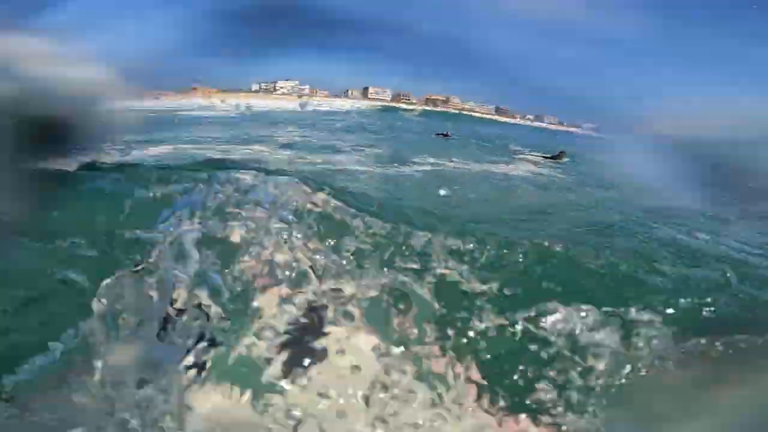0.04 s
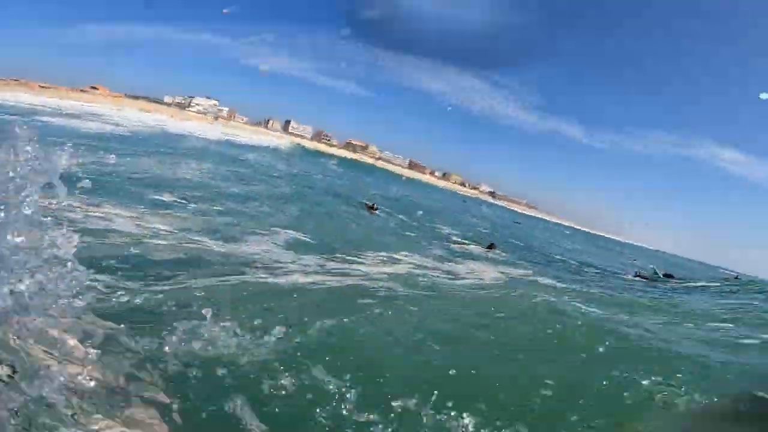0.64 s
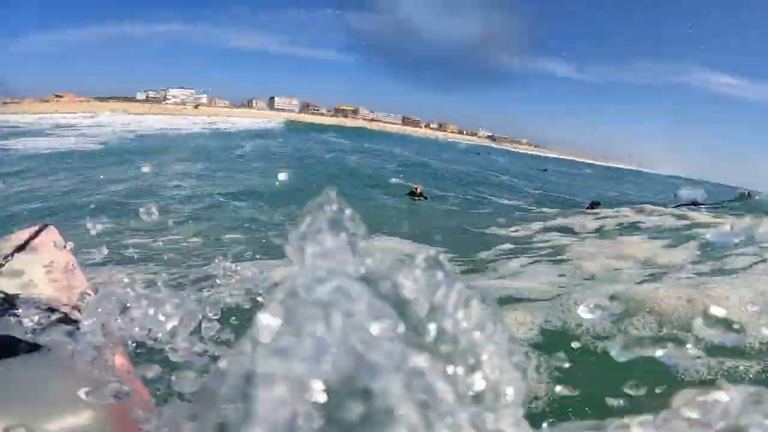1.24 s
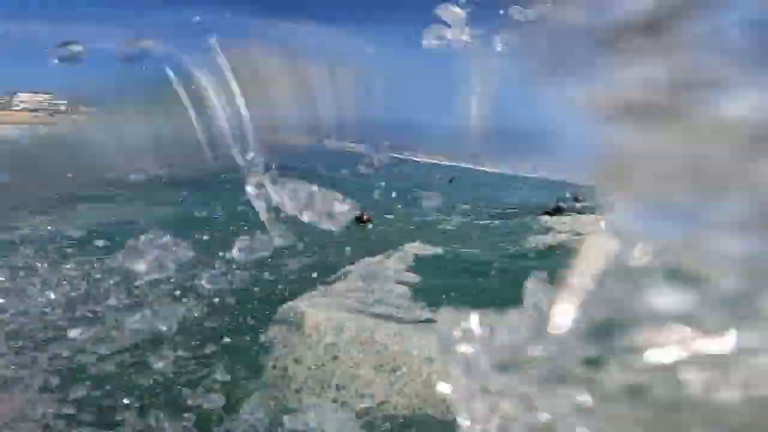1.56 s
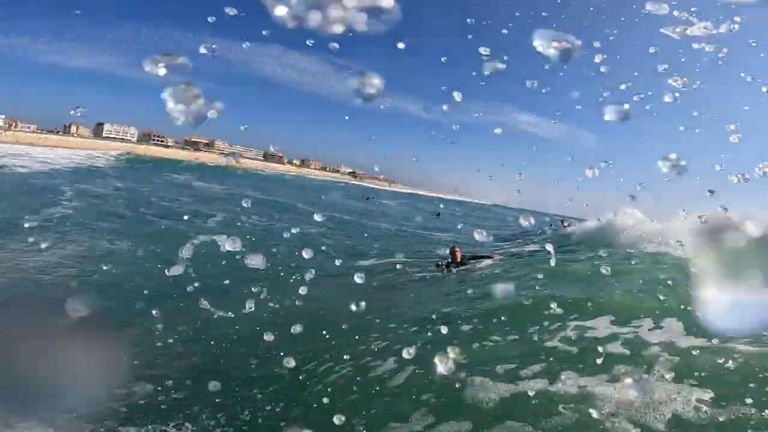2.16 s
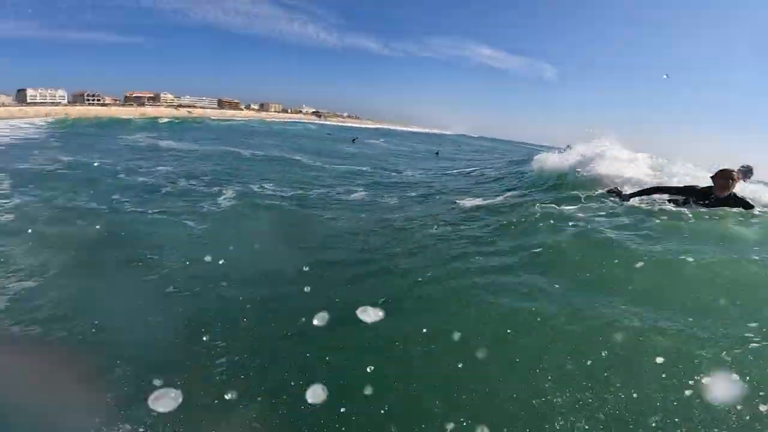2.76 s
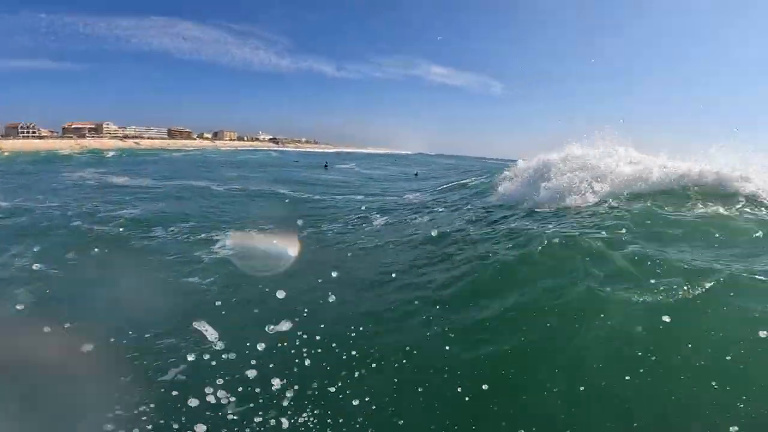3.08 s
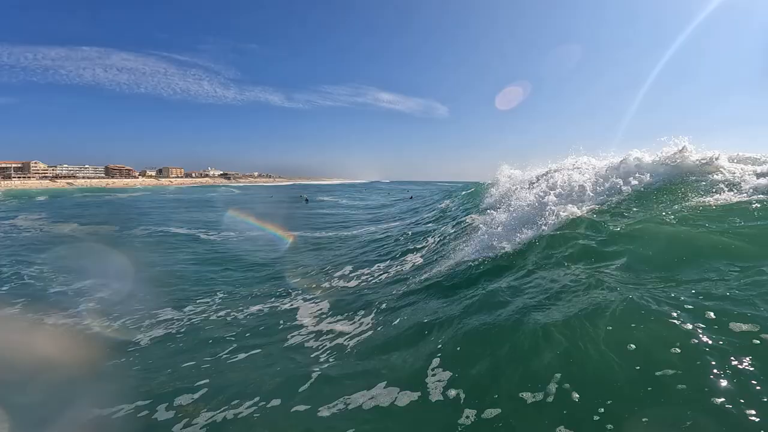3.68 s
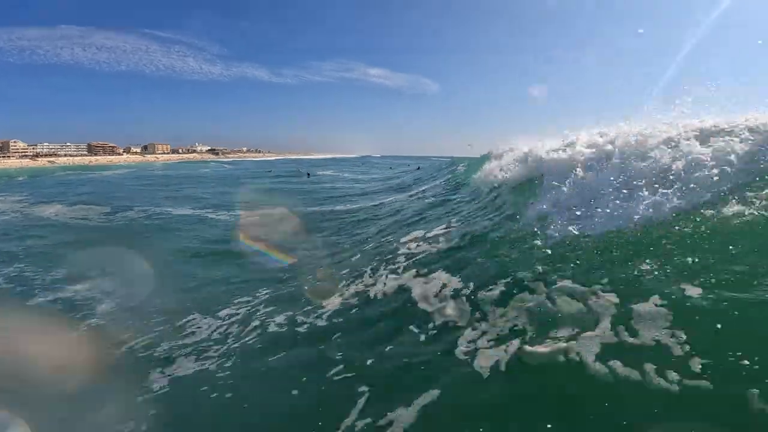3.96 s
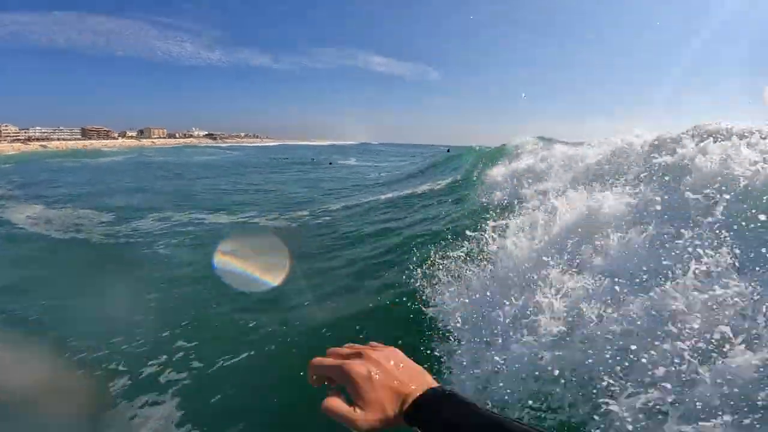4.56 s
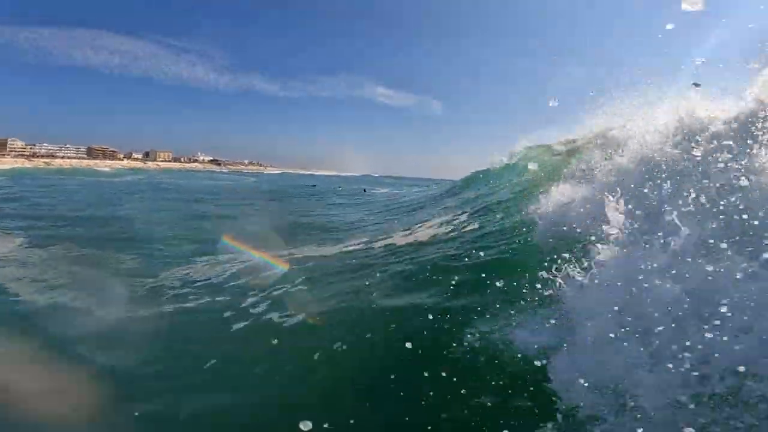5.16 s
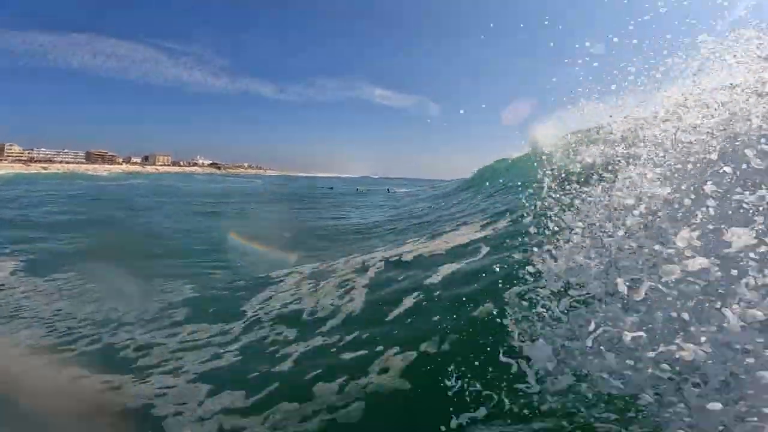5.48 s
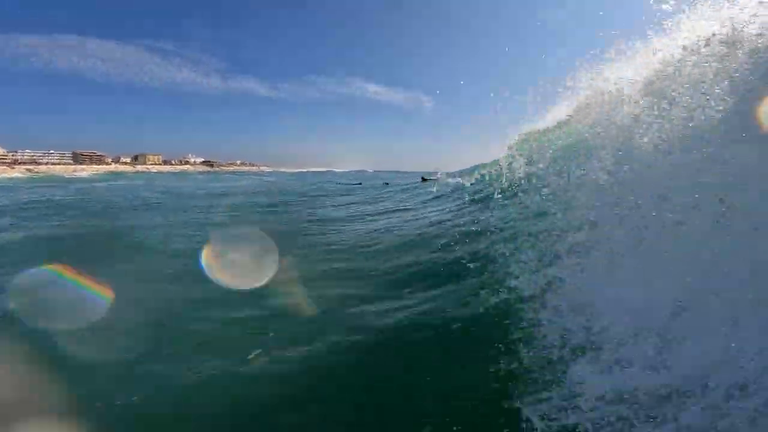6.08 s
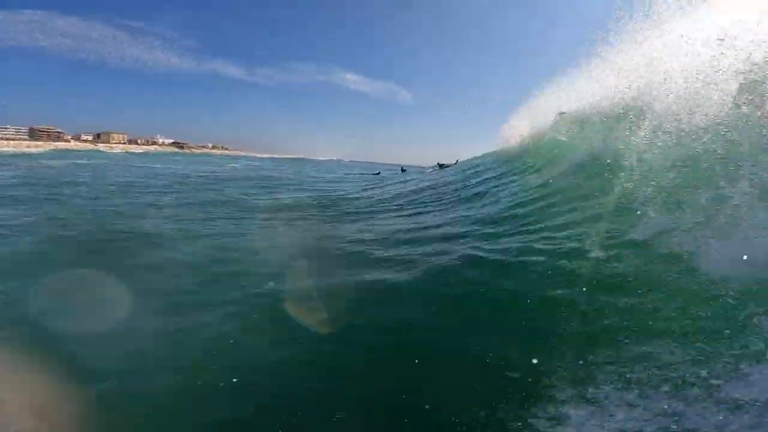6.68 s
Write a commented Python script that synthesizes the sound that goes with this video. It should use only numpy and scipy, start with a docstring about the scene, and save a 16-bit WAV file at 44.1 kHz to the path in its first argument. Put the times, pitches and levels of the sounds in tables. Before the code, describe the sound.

A surfer paddles through the sea, heard on a small waterproof camera at the waterline. Splashes slap the housing, drops tick and water gurgles around the board, the bigger splashes briefly muffling everything. The sound then settles into a steady, hollow rush of white water with gusty wind rumble as the wave is ridden. Near the end come one hard slap and a few smaller splashes and drips.

```python
"""Surfing, heard at the waterline

A surfer paddles into a wave and rides it, a small waterproof camera close to the water. Wind and spray
rush over its wet microphone ports, which ring hollowly; water churns and gurgles round the board.
Splashes slap the housing and drops tick on it; splashes and a few drops leave a film that muffles
the ports until it drains."""
import sys
import numpy as np
from scipy import signal
from scipy.fft import rfft, irfft, next_fast_len
from scipy.io import wavfile
from scipy.ndimage import uniform_filter1d, map_coordinates

SR = 44100
rng = np.random.default_rng(int(sys.argv[2]) if len(sys.argv) > 2 else 0)


def dump(signal):
    """Clip the signal to [-1, 1] and save it as 16-bit WAV at the path in sys.argv[1]."""
    limited = np.clip(np.atleast_2d(signal).T, -1, 1)
    pcm = np.round(limited * 32767).astype(np.int16)
    wavfile.write(sys.argv[1], SR, pcm)


N = 305613
TIME = np.arange(N) / SR
PADDLE_END_S = 1.45

# water slapping board and housing: (time [s], relative level [dB], crest pitch [Hz], film loss [dB])
SLAPS = [(0.158, -4.5, 775, 18), (0.878, -1.5, 824, 17.5), (0.9224, -5, 622, 19), (0.969, -11, 283.4, 7),
         (1.1082, -7, 463, 3.5), (1.274, -7, 926, 11), (1.4102, 0.5, 565, 12), (1.428, -14.5, 560, 8),
         (1.4532, -2.5, 660, 19), (1.492, -6.5, 625, 8), (1.505, -6, 684, 10.5), (1.5216, -11, 751, 4),
         (1.5262, -2.5, 296.5, 2), (1.641, -8, 323, 6), (1.655, -13, 521, 10), (1.677, -5.5, 351, 4.5),
         (1.767, -6, 323, -9), (1.781, -5, 690, 5.5), (1.7909, -7, 664, 8.5), (1.885, -10, 627, 1),
         (2.196, -13.5, 379, 1.5), (2.243, -9, 321, 4), (2.289, -8, 436, 6.5), (2.342, -5.5, 297, 2.5),
         (2.396, -8, 322, 6.5), (2.4244, -6, 517, 11.5), (5.574, 0.5, 737, 24), (6.032, -8.5, 405, -1.5),
         (6.1129, -9.5, 548, 3.5), (6.16, -10, 890, 4), (6.21, -5.5, 170, 1)]
# port roll-off above the upper mode: (frequency [Hz], gain [dB])
MEMBRANE = [(3800, -1.5), (4700, -15), (7000, -23.5), (12000, -23)]


def amp(db):
    """Decibels to gain."""
    return 10 ** (np.asarray(db) / 20)


def unit(x):
    """Scale to rms 1."""
    return x / np.sqrt(np.mean(x ** 2) + 1e-20)


def along(points, hz):
    """(Hz, value) points read on a log axis."""
    f, v = np.transpose(points)
    return np.interp(np.log(hz + 1), np.log(f + 1), v)


def curves(rows):
    """Per-sample curve for each column after the time."""
    s, *columns = np.transpose(rows)
    return [np.interp(TIME, s, c) for c in columns]


def wobble(rate_hz):
    """Smooth random curve, rate_hz knots a second."""
    return map_coordinates(rng.standard_normal(int(N * rate_hz / SR) + 4), [TIME * rate_hz])


def swell(s, length_s):
    """Rounded rise and fall, peak 1."""
    return np.sqrt(abs(np.sin(np.pi * np.clip((TIME - s) / length_s, 0, 1))))


def add(track, s, sound):
    """Mix a sound into a track at time s."""
    start = max(round(s * SR), 0)
    track[start:start + len(sound)] += sound[:N - start]


def panned(x, left_db):
    """Stereo with left minus right = left_db."""
    return x * amp([[left_db / 2], [-left_db / 2]])


def filtered(x, response):
    """Apply a complex frequency response."""
    size = next_fast_len(N + SR // 4)
    return irfft(rfft(x, size) * response(np.fft.rfftfreq(size, 1 / SR)), size)[..., :N]


def coloured(x, points):
    """Apply a (Hz, dB) spectrum."""
    return filtered(x, lambda hz: amp(along(points, hz)))


def noise(spectrum, patchy_db, channels=1):
    """Coloured noise with drifting patches of random gain, rms 1."""
    bins = signal.stft(rng.standard_normal((channels, N)), nperseg=512)[2]
    patches = uniform_filter1d(rng.standard_normal(bins.shape[1:]), size=4, axis=0)
    patches = uniform_filter1d(patches, size=8, axis=1)
    white = signal.istft(bins * amp(patchy_db * unit(patches)), nperseg=512)[1][:, :N]
    return unit(coloured(white, spectrum))


def ringing(pitch_hz, width_hz, channels=1):
    """Noise-driven resonance of moving pitch, rms 1."""
    white = rng.standard_normal((2, channels, N))
    drive = filtered(white, lambda hz: 1 / (1 + (hz / width_hz) ** 2) * (hz < 500))
    phase = 2 * np.pi * np.cumsum(pitch_hz) / SR
    return unit(drive[0] * np.sin(phase) + drive[1] * np.cos(phase))


def grains(count, span_s, hz, spread, cycles, glide, size_db):
    """Ringing grains scattered over a span, rms 1 there; glide bends each one's pitch."""
    onset_s = rng.uniform(*span_s, (count, 1))
    pitch_hz = hz * np.exp(spread * rng.standard_normal((count, 1)))
    size = amp(size_db * np.minimum(rng.exponential(1, (count, 1)), 3)) * rng.choice([-1, 1], (count, 1))
    k = np.arange(SR // 40)
    age = k / SR * pitch_hz / cycles
    envelope = size * np.exp(-age) * (1 - np.exp(-4 * age)) ** 2
    waves = envelope * np.sin(2 * np.pi * cycles * age * (1 + glide * age))
    track = np.bincount(((onset_s * SR).astype(int) + k).ravel(), waves.ravel(), N)[:N]
    return track / np.sqrt(np.sum(track ** 2) / (SR * (span_s[1] - span_s[0])))


def ports(x):
    """Wet ports: left favours low mids, right the highs; left leads by about 1/4 cycle above the bass."""
    # port balance: (frequency [Hz], left minus right [dB])
    balance = [(40, -8), (120, 4.5), (200, 7), (400, 5.5), (800, 5), (1100, 3.5), (1450, -1), (2200, -4),
               (3300, -6), (5000, -12)]

    def response(hz):
        lead_rad = along([(60, 0.089), (250, 0.95), (1200, 1.73), (4000, 1.41)], hz)
        left = amp(along(balance, hz) / 2) * np.exp(.5j * lead_rad)
        pair = np.array([left, 1 / left])
        return pair / np.sqrt(np.mean(abs(pair) ** 2, axis=0))
    return filtered(x, response)


def wind(full_db=-19, start_db=-6.5, rise_s=0.72, gust_db=1.94):
    """Gusting eddies buffet each port mostly on its own, harder on the windward right."""
    # buffeting spectrum: (frequency [Hz], level [dB])
    buffet = [(8, -16), (16, 5.5), (40, -3), (80, -3), (130, -14.5), (250, -22), (600, -39.5), (3500, -120)]
    level_db = full_db + start_db * np.maximum(1 - TIME / rise_s, 0) + gust_db * wobble(5.3)
    left_db = -4.725 - 0.63 * wobble(2)  # the head turns in the wind
    sides = amp(np.array([left_db, -left_db]) / 2)
    sides /= np.sqrt(np.mean(sides ** 2, axis=0))
    eddies = noise(buffet, patchy_db=1, channels=2) + 0.66 * noise(buffet, patchy_db=2.5)
    return amp(level_db) * unit(eddies * amp(2.1 * wobble(8.8)) * sides)


def churn():
    """Water tumbles round the board in quick lumps."""
    # churn spectrum: (frequency [Hz], level [dB])
    spectrum = [(50, -18.5), (110, -2.5), (170, 0), (300, -4), (500, -8), (700, -9), (1000, -21),
                (2000, -76.5), (5000, -120)]
    water = noise(spectrum, patchy_db=1.5) + 0.76 * noise(spectrum, patchy_db=1, channels=2)
    return unit(ports(water * amp(0.96 * wobble(70))))


def hollow(wander=0.0147):
    """Flow blows across the port cavities, which ring like small bottles."""
    # cavity resonance as water shifts inside: (time [s], pitch [Hz])
    cavity = [(.45, 879), (.75, 821.7), (1.1, 925.7), (2.15, 888.4), (2.7, 881.2), (3.06, 796),
              (3.35, 853.3), (3.9, 820.3), (4.3, 810.5), (5.15, 880), (5.3, 888.5), (5.5, 792.3)]
    pitch_hz = curves(cavity)[0] * (1 + wander * wobble(6))
    return unit(panned(ringing(pitch_hz, width_hz=130, channels=2), left_db=11.5))


def rush(flooded_rise=.065, drained_s=2.2, draining_s=.25, wander=.012):
    """White water flutters as it tears and rings the ports, whose pitch sinks as they drain."""
    # white-water spectrum: (frequency [Hz], level [dB])
    spectrum = [(150, -18.5), (600, -10), (1000, -6.5), (1200, -3.5), (1420, -0.5), (1600, -7.5),
                (1950, -18), (2200, -20), (2500, -28.5), (2850, -27.5), (3080, -34), (3400, -35),
                (3800, -47), (4600, -68.5), (10000, -120)]
    # port resonances: (pitch [Hz], width [Hz], level re foam [dB])
    resonances = [(1425.4, 119, -1.5), (3286, 190, -28)]
    flooded = np.clip((drained_s - TIME) / draining_s, 0, 1)
    shift = 1 + flooded_rise * flooded + wander * wobble(7)
    foam = noise(spectrum, patchy_db=1.2) + .18 * noise(spectrum, patchy_db=0, channels=2)
    tones = sum(amp(db) * ringing(hz * shift, width_hz) for hz, width_hz, db in resonances)
    flutter_db = .8 * wobble(25) + 1.4 * wobble(160)
    return unit(ports((foam + tones) * amp(flutter_db)))


def fizz():
    """Fine spray hisses, mostly on the right port."""
    # hiss spectrum: (frequency [Hz], level [dB])
    spectrum = [(2000, -28.5), (3800, -1.5), (4700, -6.5), (5900, -8.5), (7000, -23), (8300, -30.5),
                (10500, -73.5)]
    hiss = noise(spectrum, patchy_db=2.5, channels=2) * amp(0.7 * wobble(200))
    return unit(panned(hiss, left_db=-15))


def spatter(drops_per_s=330, level_db=-54, fade_db_per_s=39.5):
    """Tiny drops thrown by the arms sizzle in the upper port resonance, fading after the paddling."""
    end_s = PADDLE_END_S + 1
    sizzle = grains(int(drops_per_s * end_s), (0, end_s), hz=3534, spread=0.03, cycles=8,
                    glide=0, size_db=4.5)
    return ports(sizzle * amp(level_db - fade_db_per_s * np.maximum(TIME - PADDLE_END_S, 0)))


def gurgles():
    """Trapped air throbs, gliding in pitch as the pocket changes size."""
    # air pockets under the board: (time [s], length [s], first pitch [Hz], last pitch [Hz], level [dB])
    pockets = [(0, 0.11, 188, 158, -24.5), (.165, 0.068, 128, 140, -27.5), (.26, 0.08, 124, 204, -30.5),
               (.925, 0.023, 202.4, 137.6, -14.5), (1.08, 0.26, 72.6, 82.1, -20.5),
               (1.526, 0.027, 258, 216.6, -14.5), (1.57, 0.031, 110.3, 165, -15.5),
               (1.642, 0.016, 208.5, 149.5, -22), (1.664, 0.037, 140, 214, -14),
               (1.725, .028, 139, 118.3, -17), (1.96, 0.076, 148, 208, -25.5),
               (2.052, 0.016, 169.2, 139.5, -13), (2.1, 0.13, 191, 133.8, -22), (6.165, 0.074, 50, 58, -12),
               (6.83, 0.1, 150.2, 180, -24)]
    track = np.zeros(N)
    for s, length_s, first_hz, last_hz, db in pockets:
        progress = np.linspace(0, 1, int(length_s * SR))
        pitch_hz = first_hz * (last_hz / first_hz) ** progress
        envelope = amp(db) * np.sqrt(abs(np.sin(np.pi * progress)))
        add(track, s, envelope * np.sin(2 * np.pi * np.cumsum(pitch_hz) / SR))
    return ports(track)


def sprays(grain_db=3):
    """Handfuls of spray land on the housing in short, grainy sizzles."""
    # spray landings: (time [s], length [s], level [dB])
    handfuls = [(0, 0.11, -40.5), (0.134, 0.021, -43), (0.386, .014, -46.5), (.77, .015, -44),
                (0.809, 0.022, -37.5), (1.583, 0.034, -39.5), (2.127, 0.082, -42), (6.054, .08, -52.5),
                (6.21, 0.097, -52)]
    # sizzle spectrum: (frequency [Hz], level [dB])
    spectrum = [(1500, -22), (2200, 7), (3400, 3), (4500, -6.5), (6000, -16.5), (7800, -26), (9000, -36),
                (12000, -35)]
    envelope = sum(amp(db) * swell(s, length_s) for s, length_s, db in handfuls)
    sizzle = noise(spectrum, patchy_db=0, channels=2) * amp(grain_db * wobble(600))
    return envelope * unit(panned(sizzle, left_db=-10.5))


def crack(decay_s):
    """Noise burst at first contact, peak 1."""
    t = np.arange(SR // 100) / SR
    burst = rng.standard_normal(len(t)) * np.exp(-t / decay_s)
    return burst / abs(burst).max()


def stray_drops(count, ring_db=-31, ping_db=-32, snap_db=-37, ping_hz=3400, t60_s=0.0043, flight_s=0.048):
    """Rows for drops(): small drops thrown up by the arms land at random."""
    rows = []
    for when, size in rng.random((count, 2)):
        s = when * (PADDLE_END_S + flight_s)
        size_db = 4 * (2 * size - 1)
        rows.append((s, ring_db + size_db, ping_db + size_db, ping_hz, t60_s, snap_db + size_db))
    return rows


def drops(attack_s=0.00097, upper_hz=3320, upper_db=-8.5, upper_t60_s=0.0087):
    """Each drop snaps, gives a short ping at its own pitch and rings the ports."""
    # drops on the housing, levels relative:
    # (time [s], port ring [dB], ping [dB], ping pitch [Hz], ping t60 [s], snap [dB])
    impacts = [(.026, -22, -11, 3100, 0.005, -24.5), (.071, -17, -18, 3510, 0.0071, -29.5),
               (.122, -24, -19, 3500, .008, -36.5), (.3977, -38, -21, 3660, 0.0058, -18.5),
               (.528, -16, -11.5, 3460, 0.0072, -32), (.5823, -22, -13, 3390, 0.0095, -32),
               (.726, -21, -19.5, 3360, 0.0083, -39.5), (.8169, -10.5, -19.5, 3920, 0.011, -26.5),
               (.893, -33.5, -31, 3980, 0.011, -29), (1.276, -15, -26, 2300, .006, -27.5),
               (1.355, -11, -32, 2200, .008, -43), (1.544, -15.5, -41, 2470, .008, -54),
               (1.583, -18.5, -33, 2300, 0.011, -35.5), (1.6034, -8, -1, 2170, .011, -13),
               (1.627, -14.5, -19, 2260, 0.02, -27.5), (1.635, -20, -22, 2230, .02, -43),
               (1.643, -11.5, -24, 2200, .013, -42.5), (1.6775, -28, -21, 2750, .009, -34),
               (1.688, -16, -8, 1180, 0.022, -47.5), (1.6895, -22.5, -15, 2260, 0.017, -43),
               (1.718, -13.5, -9.5, 2040, 0.012, -32), (1.757, -22, -26, 2270, 0.02, -45.5),
               (1.761, -11.5, -20, 2000, .025, -40), (1.7722, -10, -27.5, 1800, .018, -44),
               (1.805, -22.5, -43, 2200, .01, -38.5), (1.85, -17.5, -7.5, 1244, 0.029, -44.5),
               (1.852, -26.5, -20.5, 1820, 0.027, -46), (1.899, -29, -6.5, 964, 0.024, -57),
               (1.9079, -16, -17.5, 2320, 0.0074, -35.5), (1.958, -13, -28.5, 3430, .016, -45),
               (1.973, -8, -34, 3400, 0.025, -44), (2.066, -16, -34, 3340, .013, -42),
               (2.3537, -12, -31.5, 2400, .007, -21), (2.425, -8.5, -21, 2340, 0.0087, -36),
               (2.468, -19, -16.5, 2800, 0.0082, -45), (2.6277, -11, -13.5, 2150, 0.0087, -39),
               (5.5935, -24, -35, 2140, .008, -37.5), (5.856, -14.5, -1, 2970, 0.0065, -27),
               (6.53, -14, -13, 3050, 0.0061, -19), (6.7911, -5.5, -14.5, 2500, 0.0056, -31)]
    # port modes: (pitch [Hz], level [dB], t60 [s])
    port_modes = [(1413, 5.5, 0.016), (1260, 9.5, 0.0069), (1750, -4.5, 0.015)]
    # first-contact spectrum: (frequency [Hz], gain [dB])
    snap_spectrum = [(1000, -9), (2000, 0), (3300, 4), (6000, -9), (8000, -21), (12000, -36)]
    track, snaps = np.zeros((2, N))
    t = np.arange(SR // 20) / SR

    def ring(modes, spread):
        shift = 1 + spread * rng.normal()
        return sum(amp(db + rng.normal(0, 1) - 60 * t / t60_s) * np.sin(2 * np.pi * hz * shift * t)
                   for hz, db, t60_s in modes)
    for s, ring_db, ping_db, ping_hz, t60_s, snap_db in [*impacts, *stray_drops(count=22)]:
        ping_modes = [(ping_hz, 1, t60_s)]
        if ping_hz > 1500:  # high pings also ring the upper port mode
            ping_modes.append((upper_hz, upper_db, min(t60_s, upper_t60_s)))
        ping = amp(ping_db) * ring(ping_modes, spread=0.022)
        port_ring = amp(ring_db) * ring(port_modes, spread=0.07)
        add(track, s, (port_ring + ping) * (1 - np.exp(-t / attack_s)))
        add(snaps, s, amp(snap_db) * crack(decay_s=0.0016))
    return ports(coloured(track, MEMBRANE) + coloured(snaps, snap_spectrum))


def slaps(crest_s=.003, fall_s=0.00094, rest_hz=125, push_s=0.0011, push_db=-8, crack_db=-16):
    """A sheet of water lands: a ragged thwop of diving pitch, then a low push; hard ones also crack."""
    # crack spectrum: (frequency [Hz], gain [dB])
    crack_spectrum = [(600, -7.5), (1500, 7), (3600, -2), (4500, -9), (7000, -23), (9000, -25),
                      (12000, -30.5)]
    track, cracks = np.zeros((2, N))
    t = np.arange(SR // 16) / SR
    envelope = (t / crest_s * np.exp(1 - t / crest_s)) ** 4
    push_age = t / push_s
    push = push_age ** 2 * (3 - push_age) * np.exp(-push_age)
    chance = rng.uniform(-1, 1, (len(SLAPS), 2))
    tearing_rad = 0.26 * wobble(700)
    for (s, db, crest_hz, _), (offset, pace) in zip(SLAPS, chance):
        dive_s = fall_s * np.exp(0.069 * pace)
        dive = np.minimum(np.exp((crest_s - t) / dive_s), 1.226)
        turns = np.cumsum(rest_hz + (crest_hz - rest_hz) * dive) / SR
        phase = 2 * np.pi * turns + np.pi * offset + tearing_rad[round(s * SR):][:len(t)]
        add(track, s, amp(db) * envelope * np.sin(phase))
        add(track, s + crest_s, amp(db + push_db) * push)
        add(cracks, s + crest_s, amp(5.6 * db + crack_db) * crack(decay_s=0.00079))
    return ports(track) + panned(coloured(cracks, crack_spectrum), left_db=18.5)


def water_film(close_s=0.0032, hold_s=0.031, drain_db_per_s=140):
    """Loss [dB]: a film closes over the ports after a splash, holds and drains."""
    # drops landing on the ports: (time [s], film loss [dB])
    wettings = [(1.973, 9), (6.788, 10.5)]
    loss_db = np.zeros(N)
    for s, *_, depth_db in [*SLAPS, *wettings]:
        age_s = TIME - s - close_s
        closed = np.clip(age_s / close_s, 0, 1)
        drained_db = drain_db_per_s * np.maximum(age_s - hold_s, 0)
        loss_db = np.maximum(loss_db, closed * (depth_db - drained_db))
    return loss_db


def bubbles(bubbles_per_s=300):
    """Each slosh swells and ebbs, breaking into deep glugs or small ringing bubbles."""
    # water over the ports: (time [s], length [s], level [dB], pitch [Hz], spread [ratio], decay [cycles])
    sloshes = [(0.876, .02, -18.5, 912, 0.18, 2.2), (0.921, .045, -28.5, 375, 0.23, 1.6),
               (1.406, 0.016, -22, 640, 0.17, 1.8), (1.443, 0.026, -17, 657, 0.22, 2.1),
               (1.474, .06, -23, 556, .3, 2.2), (1.53, .28, -23.5, 216, .3, 1.8),
               (1.822, .26, -27, 189.6, .25, 1.7), (1.619, .026, -30.5, 2186, 0.034, 6.3),
               (1.599, .18, -36.5, 1280, .035, 9), (1.647, .075, -29.5, 790, 0.23, 3.4),
               (1.679, 0.089, -46.5, 2170, 0.12, 8), (2.247, 0.023, -16.5, 316, .25, 2.4),
               (6.133, 0.049, -21.5, 239, 0.24, 1.2)]
    track = np.zeros(N)
    for s, length_s, db, hz, spread, cycles in sloshes:
        count = int(bubbles_per_s * length_s) + 1
        bubbling = grains(count, (s, s + length_s), hz, spread, cycles, glide=0.016, size_db=4)
        track += amp(db) * swell(s, length_s) * bubbling
    return ports(coloured(track, MEMBRANE))


def scene():
    """Wind and surging flow, muffled by the film (bass least), with the splashes on top."""
    # flow past the camera while paddling, dropping in and riding, levels relative:
    # (time [s], churn [dB], hollow ring [dB], rush [dB], fizz [dB])
    flow = [(0, -39, -56, -26, -50), (.07, -31, -26.5, -26, -63), (.28, -31, -25.5, -26.5, -62.5),
            (.45, -33.5, -22.5, -27.5, -59), (.58, -28, -25, -28, -63), (.68, -29, -26, -23.5, -59),
            (.76, -25, -24.5, -29, -67), (.86, -30, -23.5, -28.5, -60), (1.02, -28.5, -21.5, -23.5, -59),
            (1.16, -26.5, -27.5, -24.5, -59.5), (1.4, -25, -23, -22.5, -57.5),
            (1.6, -31.5, -32, -32.5, -63), (1.85, -29, -31, -35.5, -71), (2.0, -26, -25, -39, -70),
            (2.15, -27.5, -19.5, -26, -65.5), (2.3, -25, -27.5, -26.5, -59),
            (2.48, -24.5, -20.5, -28.5, -61), (2.6, -28, -19, -24, -57.5), (2.68, -32, -27, -29, -63),
            (2.8, -23.5, -19.5, -27, -61), (3.1, -24, -23, -22.5, -58.5), (3.26, -23, -17.5, -26.5, -61.5),
            (3.34, -24, -21, -34, -68.5), (3.44, -23.5, -16.5, -25.5, -63.5), (3.62, -21, -18.5, -25, -63),
            (3.86, -22.5, -21.5, -24, -70.5), (4.2, -22.5, -20, -26.5, -63), (4.35, -28, -19.5, -25, -62.5),
            (4.5, -23.5, -27.5, -20.5, -61), (5.05, -23.5, -23.5, -24.5, -61),
            (5.14, -28.5, -17, -22.5, -58), (5.3, -29.5, -18.5, -21.5, -55.5),
            (5.55, -20, -19, -24.5, -61.5), (5.7, -27, -23.5, -25, -60.5), (5.88, -25, -37, -26.5, -61.5),
            (6.08, -25.5, -25.5, -22.5, -54.5), (6.3, -30.5, -31, -21.5, -55), (6.93, -23, -29, -22, -58)]
    churn_db, hollow_db, rush_db, fizz_db = curves(flow)
    surge_db = 1.5 * (TIME < PADDLE_END_S) * wobble(9.7)  # chop of paddling
    film_db = water_film()
    low = amp(-0.33 * film_db) * wind() + amp(churn_db + 1 - 0.83 * film_db) * churn()
    mid = amp(surge_db - film_db) * (amp(hollow_db - 5) * hollow() + amp(rush_db + 1.5) * rush())
    high = amp(fizz_db + 3 + surge_db - .8 * film_db) * fizz() + amp(-.6 * film_db) * spatter()
    splashes = gurgles() + sprays() + drops() + amp(-3) * slaps() + bubbles()
    return low + mid + high + splashes


def record(dry, fade_s=.004, top_hz=12700):
    """Ends fade, the housing dulls the treble, peaks round off at full scale, the top band is cut."""
    fade = np.clip(np.minimum(TIME, TIME[-1] - TIME) / fade_s, 0, 1)
    dull = coloured(dry * fade, [(6500, -0.5), (9000, -4.0), (12000, -10.0)])
    rounded = dull / (1 + abs(dull) ** 12) ** (1 / 12)
    return filtered(rounded, lambda hz: hz < top_hz)


dry = scene()
out = record(dry)
dump(out)
```